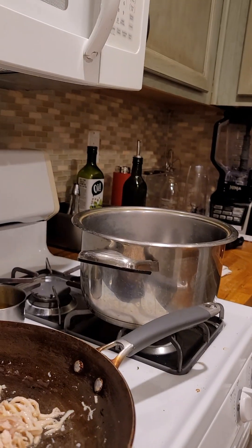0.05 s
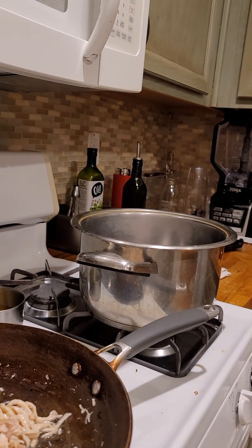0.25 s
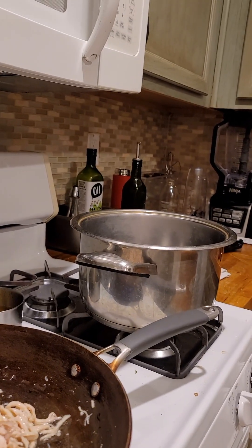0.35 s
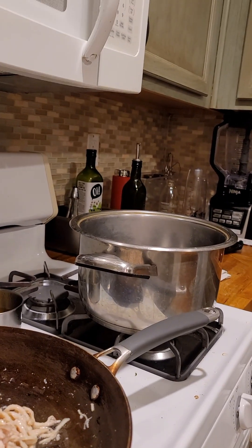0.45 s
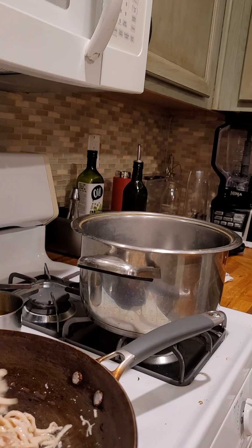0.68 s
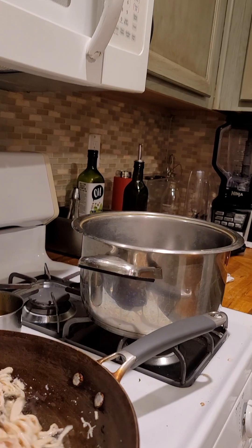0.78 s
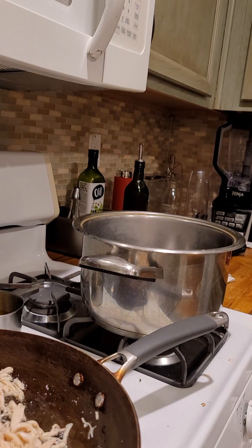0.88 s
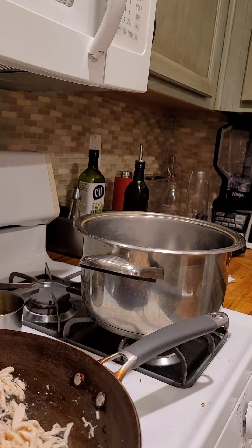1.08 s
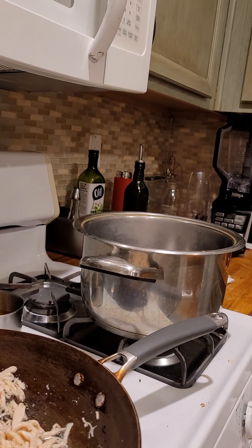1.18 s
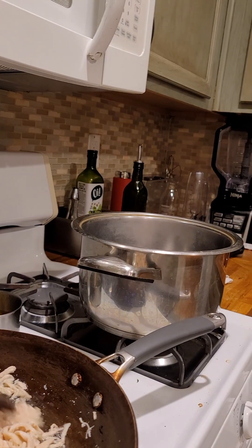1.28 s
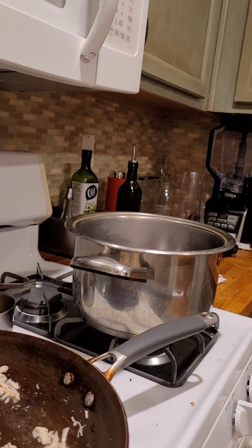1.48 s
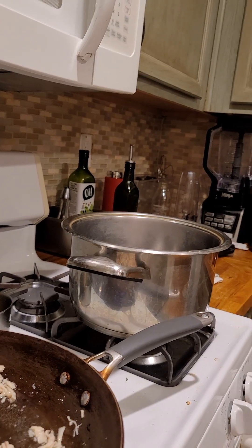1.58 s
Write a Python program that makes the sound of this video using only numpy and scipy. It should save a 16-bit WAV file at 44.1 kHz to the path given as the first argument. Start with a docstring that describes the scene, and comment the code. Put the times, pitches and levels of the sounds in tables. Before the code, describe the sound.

In a small kitchen, a utensil clacks against a frying pan, squeaks across the bottom and turns wet, spitting noodles before a last, harder scrape. Something rubs the left microphone during the stir, over a faint gas hiss and hum.

```python
"""A gas burner hisses in a small kitchen; a utensil knocks a frying pan, edge then flat, and it rings.
The utensil drags over the bottom with a squeal, turns wet noodles and scrapes once more: stick-slip
friction rasps, makes the utensil groan and drives the pan's modes. The noodles squelch and sizzle in
tiny pops and spits of fat. An appliance hums faintly; something brushes the left microphone in the stir."""
import sys
import numpy as np
from scipy import signal
from scipy.fft import rfft, irfft
from scipy.io import wavfile

SR = 44100
rng = np.random.default_rng(int(sys.argv[2]) if len(sys.argv) > 2 else 0)


def transcribe(u):
    """Save the signal u as a 16-bit wav file named by the first command-line argument.

    u: samples, shape (n,) or (channels, n), limited to [-1, 1]; the rate is SR.
    q: integer samples, one column per channel.
    """
    v = np.clip(np.atleast_2d(u).T, -1, 1)
    q = np.round(v * 32767).astype(np.int16)
    wavfile.write(sys.argv[1], SR, q)


N = 72765
T = np.arange(N) / SR
HZ = np.maximum(np.arange(N + 1) * SR / (2 * N), 1)

# edge contact, flat contact: t/s, level/dB
KNOCKS = [(.2436, 0.5), (.2503, 3.5)]
# dense, short ringing of utensil, pan and grate: f/Hz, level/dB
CLACK_SPECTRUM = [(150, -40), (400, -4), (700, 4.5), (1050, -19), (1700, 7), (2900, 4), (3800, -3.5),
                  (4700, 0.5), (6400, -13), (8800, -24), (10500, -29.5), (15000, -48)]
# kitchen reverberation: f/Hz, level/dB
KITCHEN_SPECTRUM = [(130, -26), (180, -8.5), (260, -20), (450, -12), (700, -6), (1050, -10), (1600, -3),
                    (2800, -16.5), (6000, -33), (12000, -53)]
# balance of sounds from the pan: f/Hz, left minus right/dB
PAN_BALANCE = [(150, 0), (400, -1), (750, -3), (1050, -3), (1600, -11.5), (2300, -8), (3000, -4), (5000, 1),
               (7000, -3), (8200, 3), (10500, 0), (15000, 6)]


def knock():
    """Each contact rings the pan and gives a crack, a clack and a tail in the kitchen."""
    crack_env = from_db(-16) * struck(t60_s=0.027)
    clack_env = from_db(-23.5) * struck(t60_s=0.084)
    build_s = 0.014
    tail_env = from_db(-26) * decay(t60_s=0.34) * (1 - np.exp(-T / build_s))
    out = from_db(-4) * pan(clicks(KNOCKS))
    for contact in KNOCKS:
        impact = noise(CLACK_SPECTRUM, PAN_BALANCE) * (crack_env + clack_env)
        tail = noise(KITCHEN_SPECTRUM, PAN_BALANCE) * tail_env
        out += convolve(clicks([contact]), impact + tail)
    return out


# pan modes: f/Hz, level/dB, t60/s
PAN_MODES = [(544, -34, 0.35), (700, -25, 0.14), (743, -32, 0.11), (905, -32, 0.1), (1246, -26, 0.45),
             (1518, -28, 0.2), (1738, -14, 0.1), (1868, -25, 0.15), (1985, -26, 0.18), (2365, -28, 0.14),
             (2468, -23, 0.14), (2936, -18, 0.115), (3585, -31.5, 0.1), (4305, -37, .13), (4680, -29, .08),
             (5066, -34, 0.125), (5905, -31, 0.1), (5975, -42, 0.24), (6815, -34, 0.135), (7745, -43, 0.13),
             (8760, -31, 0.06)]
# balance of the modes: f/Hz, left minus right/dB
MODE_BALANCE = [(544, -2), (905, -3), (1244, -6), (1523, -14), (1735, -12), (1986, -7), (2460, -10),
                (3585, -7), (4305, -12), (4680, -5), (5066, 10), (5905, 10), (5975, -1), (6815, -4),
                (7745, 11), (8760, 7)]


def pan(force, low_hz=323, top_hz=7600):
    """A band-limited contact force drives the pan's modes, each with its own stereo balance and lag."""
    force = signal.sosfilt(signal.butter(2, low_hz, "high", fs=SR, output="sos"), force)
    force = signal.sosfilt(signal.butter(6, top_hz, fs=SR, output="sos"), force)
    out = np.zeros((2, N))
    for k, (hz, db, t60_s) in enumerate(PAN_MODES):
        side_db = np.interp(hz, *np.transpose(MODE_BALANCE)) / 2
        lead_s = np.interp(hz, *np.transpose(MIC_PHASE)) / (2 * np.pi * hz)
        mode = (-1) ** k * ring(force, hz, t60_s)
        out[0] += from_db(db + side_db) * np.interp(T + lead_s, T, mode)
        out[1] += from_db(db - side_db) * mode
    return out


def stroke(pressure, spectrum, resonances, groan_db, ring_db):
    """Stick-slip on the pan's bottom: a rasp, plus utensil groan and pan ring set relative to it."""
    slips = stereo(grains(per_s=6000, spread_db=1), PAN_BALANCE)
    rasp = colour(slips, spectrum) * envelope(pressure)
    tones = sum((-1) ** k * from_db(db) * unit_rms(bandpass(slips, hz, width_hz))
                for k, (hz, width_hz, db) in enumerate(resonances))
    groan = from_db(groan_db) * unit_rms(tones) * envelope(pressure)
    ringing = from_db(ring_db) * rasp.std() * unit_rms(pan(rasp[1]))
    return rasp + groan + ringing


# stroke pressure as loudness: t/s, level/dB
DRAG_PRESSURE = [(.31, -58), (.34, -38), (.385, -46), (.412, -37), (.438, -40), (.462, -36.5), (.49, -37.5),
                 (.515, -39.5), (.6, -52)]
# rasp: f/Hz, level/dB
DRAG_SPECTRUM = [(160, -23), (200, -1), (420, -7), (720, 1.5), (950, -5.5), (1400, -1.5), (1750, 1),
                 (2200, -15), (6000, -44)]
# pressed utensil's resonances: f/Hz, width/Hz, level/dB
DRAG_GROAN = [(313, 17, -10.5), (457.5, 18, -8.5), (480.5, 10, -11.5), (661, 31, -6), (752, 13, -12.5),
              (1762, 43, -6.5)]


def drag():
    """The utensil slides over the bottom just after landing."""
    return stroke(DRAG_PRESSURE, DRAG_SPECTRUM, DRAG_GROAN, groan_db=0.5, ring_db=-9.5)


# pan's note during the drag: t/s, f/Hz, level/dB
SQUEAL = [(0.311, 1594, -58), (0.334, 1591, -40), (0.368, 1597, -42), (0.386, 1608, -61),
          (0.411, 1592, -36.5), (0.438, 1543, -46.5), (0.461, 1575, -39.5), (0.492, 1588, -37.5),
          (0.53, 1611, -60)]


def squeal(roughness=0.23, left_db=-22, right_db=6.5):
    """Friction sustains one wavering, slightly rough note of the pan."""
    t_s, hz, db = np.transpose(SQUEAL)
    pitch_hz = np.interp(T, t_s, hz)
    tone = np.sqrt(2) * np.sin(2 * np.pi * np.cumsum(pitch_hz) / SR)
    flutter = 1 + roughness * colour(rng.standard_normal(N), [(20, -2), (150, -5)])
    return tone * flutter * envelope(list(zip(t_s, db))) * from_db([[left_db], [right_db]])


# stroke pressure as loudness: t/s, level/dB
STIR_PRESSURE = [(.52, -51.5), (.565, -35.5), (.61, -41.5), (.68, -40), (.724, -35.5), (.746, -39),
                 (.795, -36.5), (.83, -42), (.87, -51.5), (.97, -67)]
# rasp: f/Hz, level/dB
STIR_SPECTRUM = [(180, -3), (400, -7), (610, 2.5), (770, 0), (950, -3), (1200, -7.5), (1600, 0),
                 (2500, -15), (5000, -22.5)]
# pressed utensil's resonances: f/Hz, width/Hz, level/dB
STIR_GROAN = [(479, 4.8, -3.5), (625.5, 4.7, 2), (763.4, 11.4, 1), (1187.5, 15, 7), (1678, 35, -5.5)]


def stir():
    """The utensil rubs the pan while turning the noodles."""
    return stroke(STIR_PRESSURE, STIR_SPECTRUM, STIR_GROAN, groan_db=-2.5, ring_db=-11)


# stroke pressure as loudness: t/s, level/dB
SCRAPE_PRESSURE = [(1.21, -84), (1.226, -47), (1.262, -44.5), (1.303, -46), (1.325, -26.5), (1.35, -31),
                   (1.385, -30), (1.41, -38.5), (1.47, -44)]
# rasp: f/Hz, level/dB
SCRAPE_SPECTRUM = [(200, -39), (400, -6.5), (520, 1.5), (1100, 2), (1650, 4.5), (2100, -8.5), (3200, -12),
                   (5500, -21.5), (7000, -33), (11000, -38)]
# pressed utensil's resonances: f/Hz, width/Hz, level/dB
SCRAPE_GROAN = [(585, 30, 5), (726.5, 7.1, 3.5), (918, 3.8, 2.5), (1004, 12, 1.5), (1265, 4.7, 9.5),
                (1680, 190, -1), (2016, 25, -8), (2322, 29, 0.5), (3090, 70, -8)]


def scrape():
    """The last, hardest stroke rings the pan most."""
    return stroke(SCRAPE_PRESSURE, SCRAPE_SPECTRUM, SCRAPE_GROAN, groan_db=-2, ring_db=-6)


# light utensil contacts: t/s, level/dB
TOUCHES = [(.7925, -16.5), (.9165, -44), (1.1765, -25), (1.224, -22.5)]
# one contact: f/Hz, level/dB
TOUCH_SPECTRUM = [(350, -17), (600, -9), (1000, -25), (1600, 7), (2300, -2.5), (6000, -18.5), (12000, -51)]


def touches():
    """Short knocks damped by the food."""
    tap = noise(TOUCH_SPECTRUM, PAN_BALANCE) * struck(t60_s=0.034)
    return from_db(-9.5) * convolve(clicks(TOUCHES), tap)


# crackle of the turned noodles: t/s, level/dB
CRACKLE_LEVEL = [(.3, -67), (.54, -61.5), (.62, -47), (.685, -53.5), (.73, -50.5), (.81, -50), (.88, -62),
                 (1.0, -62.5), (1.16, -58.5), (1.35, -69), (1.44, -69), (1.65, -81)]
# crackle: f/Hz, level/dB
CRACKLE_SPECTRUM = [(1200, 6.5), (2500, -4.5), (4000, -1), (5500, -7.5), (7000, -3), (9000, -17),
                    (15000, -17)]
# single smacks and spits of fat: t/s, level/dB, f/Hz
SPITS = [(0.192, -42, 8200), (0.4537, -38.5, 6730), (0.569, -39, 3880), (0.645, -37.5, 10200),
         (0.6586, -31, 4150), (0.678, -30, 4250), (0.686, -33, 3830), (0.701, -36, 4170),
         (0.7816, -34, 3050), (0.815, -32, 4200), (0.845, -38, 4670), (0.883, -39.5, 2660),
         (.9173, -38.5, 3750), (1.1468, -44, 6830), (1.3456, -32, 6770)]
# snap that starts each spit: f/Hz, level/dB
SNAP_SPECTRUM = [(2200, -13), (4000, -2), (6500, 0), (9000, -19)]


def noodles(pops_per_s=1300, t60_cycles=4.7):
    """Tiny wet pops and a few louder, snapping spits, scattered by the pan wall and the tiles."""
    pitches_hz = np.geomspace(1800, 13000, 14)
    pops = np.zeros((2, N))
    for hz in pitches_hz:
        bursts = grains(pops_per_s / len(pitches_hz), spread_db=3.5)
        pops += ring(bursts, hz, t60_cycles / hz) * hz
    crackle = colour(pops, CRACKLE_SPECTRUM) * envelope(CRACKLE_LEVEL)
    spits = sum(ring(clicks([(t_s, db)]), hz, t60_s=0.0065) for t_s, db, hz in SPITS)
    snap = from_db(-3.5) * noise(SNAP_SPECTRUM, PAN_BALANCE) * struck(t60_s=0.0093)
    snaps = convolve(clicks([(t_s, db) for t_s, db, _ in SPITS]), snap)
    direct = crackle + spits + snaps
    scatter = unit_rms(rng.standard_normal((2, N)) * decay(t60_s=0.13)) / np.sqrt(N)
    return direct + from_db(1) * convolve(direct, scatter)


# brushing rumble: t/s, level/dB
RUMBLE_LEVEL = [(.465, -71), (.488, -41), (.51, -52), (.55, -54), (.61, -38.5), (.67, -35), (.73, -39.5),
                (.808, -36.5), (.87, -47), (.98, -53.5), (1.03, -63), (1.17, -86), (1.2, -56), (1.26, -76)]
# brushing rumble: f/Hz, level/dB
RUMBLE_SPECTRUM = [(20, -26), (45, -0.5), (70, -1.5), (130, -4.5), (200, -12.5), (320, -16), (700, -32)]
# brushing hiss: t/s, level/dB
BRUSH_LEVEL = [(.48, -68), (.56, -55), (.65, -45.5), (.72, -48.5), (.8, -50), (.87, -56.5), (.93, -62)]
# brushing hiss: f/Hz, level/dB
BRUSH_SPECTRUM = [(4000, -35), (9000, -16), (11500, -4.5), (12800, 2.5), (16000, -3.5)]


def brushing(rumble_right_db=-22, hiss_right_db=-21):
    """Something rubs the left microphone: rumble and fine hiss, faint on the right."""
    rumble = colour(rng.standard_normal((2, N)), RUMBLE_SPECTRUM) * envelope(RUMBLE_LEVEL)
    hiss = colour(rng.standard_normal((2, N)), BRUSH_SPECTRUM) * envelope(BRUSH_LEVEL)
    return rumble * from_db([[0], [rumble_right_db]]) + hiss * from_db([[0], [hiss_right_db]])


# gas hiss: f/Hz, level/dB
BURNER_SPECTRUM = [(900, -12.5), (1150, -15.5), (1450, 5), (1800, 0), (2150, -14), (2750, -13.5),
                   (3250, -9), (4100, -18.5), (5050, -15.5), (5700, -25.5), (6400, -18), (9500, -33.5),
                   (15500, -34)]
# gas hiss: t/s, level/dB
BURNER_LEVEL = [(0, -41.5), (.2, -45), (.6, -45.5), (.9, -42.5), (1.0, -51), (1.15, -52.5), (1.27, -39),
                (1.47, -39), (1.65, -41)]
# balance of burner and room tone: f/Hz, left minus right/dB
BURNER_BALANCE = [(200, -2), (1200, -5), (1750, -9), (2500, 3), (3200, 1.5), (4000, -2.5), (5000, 0.5),
                  (7000, -2), (8200, 10), (10500, 3.5), (15000, 8.5)]


def burner():
    """The gas burner's hollow hiss; its level dips before the last scrape."""
    return noise(BURNER_SPECTRUM, BURNER_BALANCE) * envelope(BURNER_LEVEL)


# room tone: f/Hz, level/dB
ROOM_SPECTRUM = [(25, -9), (55, -2), (150, -6.5), (260, -2), (350, -5), (700, -4), (1100, -26.5),
                 (3000, -19), (9000, -26), (15500, -28)]


def room_tone(hum_hz=259.7, waver_depth=0.21):
    """Steady room noise and a faint, wavering appliance hum."""
    waver = 1 + waver_depth * colour(rng.standard_normal(N), [(2, 0), (12, -13)])
    hum = from_db(-64.5) * waver * np.sqrt(2) * np.sin(2 * np.pi * hum_hz * T)
    return from_db(-54) * noise(ROOM_SPECTRUM, BURNER_BALANCE) + hum


# likeness of the two microphones: f/Hz, coherence/0-1
MIC_COHERENCE = [(50, .2), (200, .92), (450, .96), (800, .68), (1300, .6), (1700, .55), (2300, .25),
                 (5000, .2), (12000, .1)]
# phase between them: f/Hz, left lead/rad
MIC_PHASE = [(500, 0), (850, -.1), (1150, -2.8), (1650, -1.7), (2300, -1.2), (3000, -.3), (8000, 0)]


def stereo(pair, balance):
    """Mix two unrelated signals to left and right with the microphones' coherence, phase and balance."""
    common, separate = rfft(pair, 2 * N)
    coherence = np.clip(at_hz(MIC_COHERENCE), 0, 1)
    mid = np.sqrt(1 + coherence) * common
    side = np.sqrt(1 - coherence) * separate
    tilt = from_db(at_hz(balance) / 2)
    left = (mid + side) * tilt * np.exp(1j * at_hz(MIC_PHASE))
    right = (mid - side) / tilt
    return irfft([left, right])[:, :N]


def noise(spectrum, balance):
    """Coloured stereo noise, rms 1."""
    return colour(stereo(rng.standard_normal((2, N)), balance), spectrum)


def colour(x, spectrum, skirt_db_per_octave=34):
    """Filter by (f/Hz, level/dB) rows, falling steeply beyond their ends; rms 1."""
    low_hz, top_hz = spectrum[0][0], spectrum[-1][0]
    octaves_outside = np.log2(np.maximum(1, np.maximum(low_hz / HZ, HZ / top_hz)))
    gain = from_db(at_hz(spectrum) - skirt_db_per_octave * octaves_outside)
    return unit_rms(irfft(rfft(x, 2 * N) * gain)[..., :N])


def clicks(rows):
    """One impulse per (t/s, level/dB) row."""
    t_s, db = np.transpose(rows)
    return np.bincount((t_s * SR).astype(int), from_db(db), N)


def grains(per_s, spread_db):
    """Random impulses of uneven size and different strength in each channel."""
    onsets = rng.random(N) < per_s / SR
    sizes = from_db(spread_db * np.minimum(rng.exponential(1, N), 4))
    return onsets * sizes * rng.standard_normal((2, N))


def ring(x, hz, t60_s):
    """Damped mode: a unit impulse starts a sine of height 1."""
    radius, angle = from_db(-60 / (t60_s * SR)), 2 * np.pi * hz / SR
    return signal.lfilter([0, np.sin(angle)], [1, -2 * radius * np.cos(angle), radius ** 2], x + 1e-18)


def bandpass(x, hz, width_hz):
    """Two-pole resonance."""
    radius, angle = np.exp(-np.pi * width_hz / SR), 2 * np.pi * hz / SR
    return signal.lfilter([1, 0, -1], [1, -2 * radius * np.cos(angle), radius ** 2], x)


def struck(t60_s, rise_s=0.00066):
    """Envelope of a blow: smooth rise, then decay."""
    return (1 - np.exp(-(T / rise_s) ** 2)) * decay(t60_s)


def decay(t60_s):
    """Exponential decay."""
    return from_db(-60 * T / t60_s)


def envelope(rows):
    """Gain from (t/s, level/dB) rows, silent outside their span."""
    return from_db(np.interp(T, *np.transpose(rows), left=-120, right=-120))


def convolve(x, response):
    """Convolve each channel with its response."""
    return irfft(rfft(x, 2 * N) * rfft(response, 2 * N))[..., :N]


def at_hz(rows):
    """Interpolate a table over log frequency."""
    hz, value = np.transpose(rows)
    return np.interp(np.log(HZ), np.log(hz), value)


def unit_rms(x):
    """Scale to rms 1."""
    return x / np.sqrt(np.mean(x ** 2) + 1e-20)


def from_db(db):
    """Decibels to gain."""
    return 10 ** (np.asarray(db) / 20)


def scene():
    """Utensil on pan, food and surroundings, in stereo."""
    utensil = knock() + drag() + squeal() + stir() + scrape() + touches()
    return utensil + noodles() + brushing() + burner() + room_tone()


def record(dry):
    """Limit peaks to full scale, then low-pass steeply."""
    cutoff_hz = 15900
    spectrum = rfft(np.clip(dry, -1, 1), 2 * N)
    return irfft(spectrum / np.sqrt(1 + (HZ / cutoff_hz) ** 600))[:, :N]


dry = scene()
out = record(dry)
transcribe(out)
```